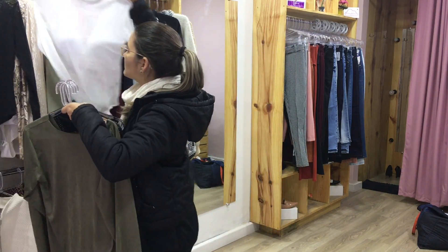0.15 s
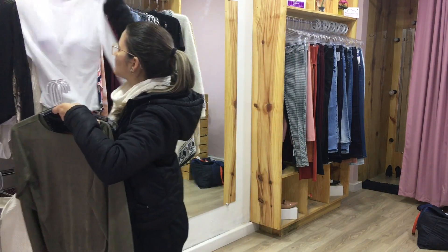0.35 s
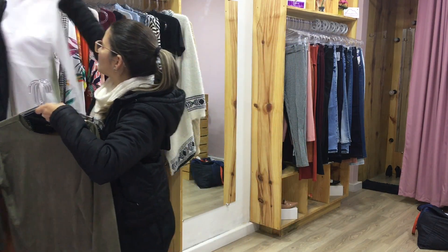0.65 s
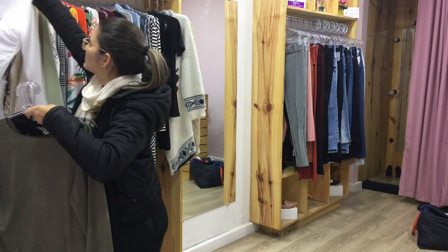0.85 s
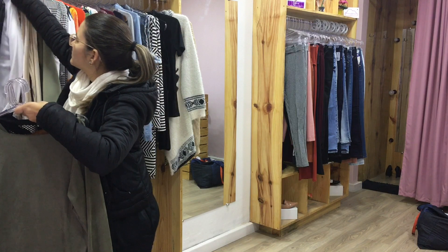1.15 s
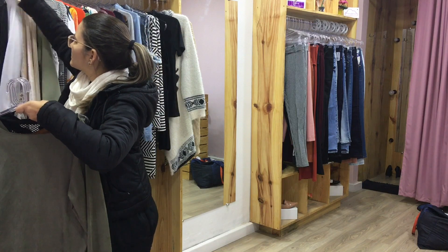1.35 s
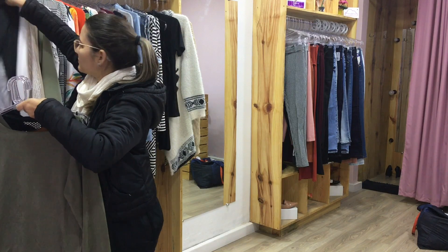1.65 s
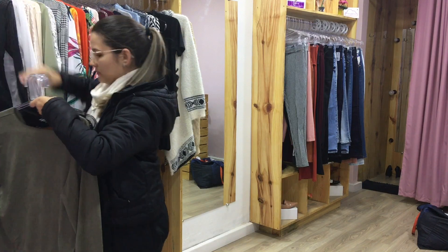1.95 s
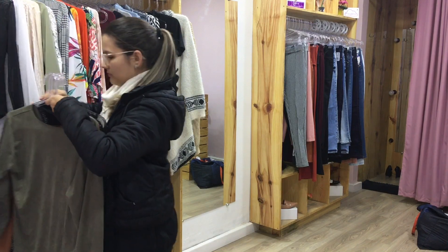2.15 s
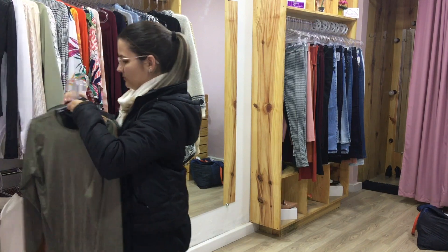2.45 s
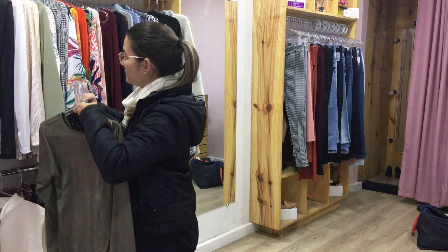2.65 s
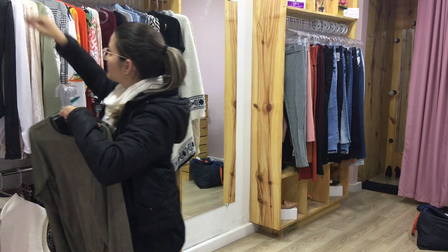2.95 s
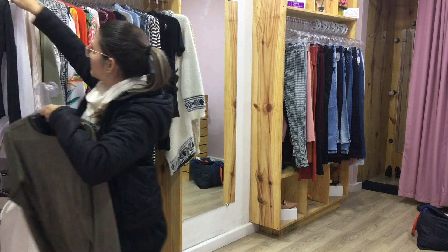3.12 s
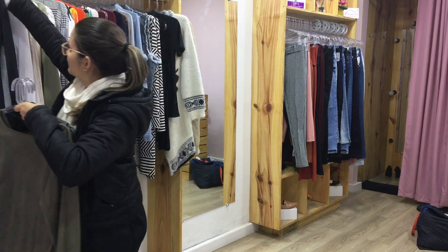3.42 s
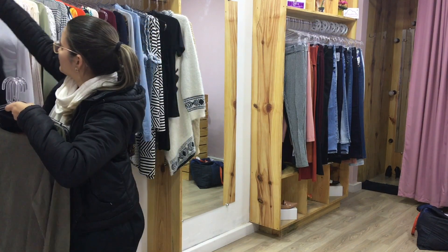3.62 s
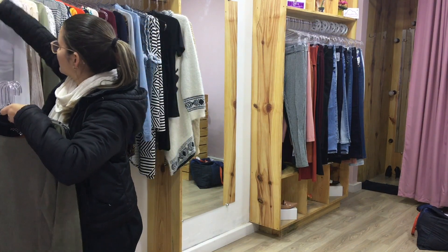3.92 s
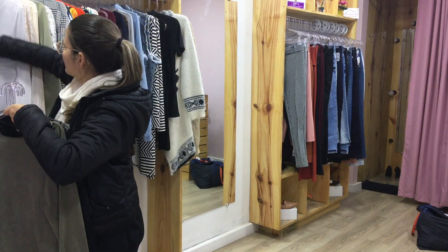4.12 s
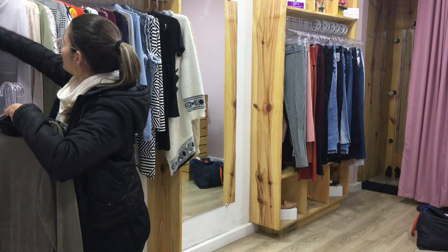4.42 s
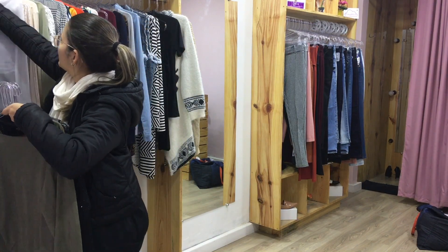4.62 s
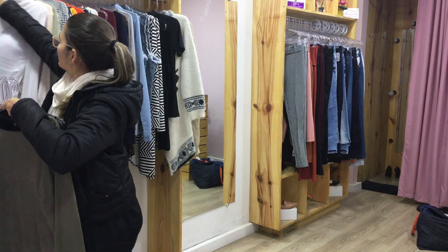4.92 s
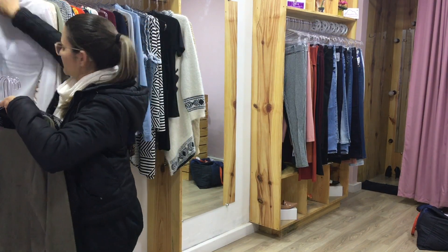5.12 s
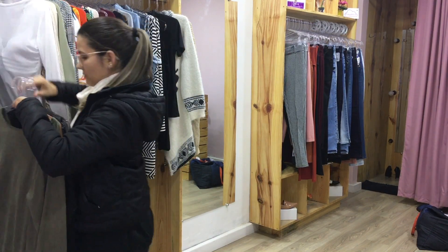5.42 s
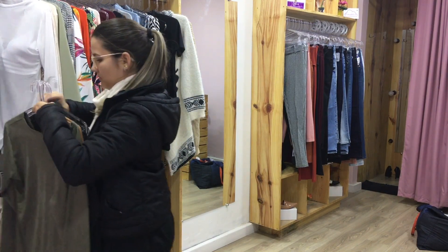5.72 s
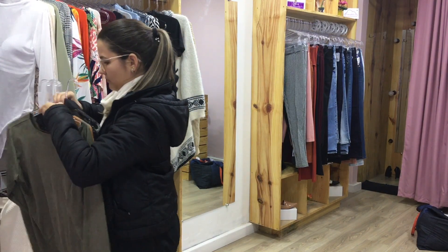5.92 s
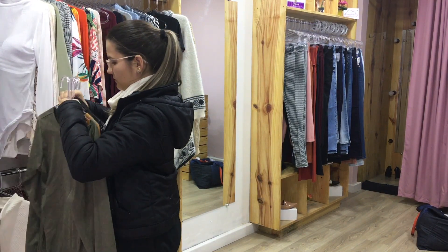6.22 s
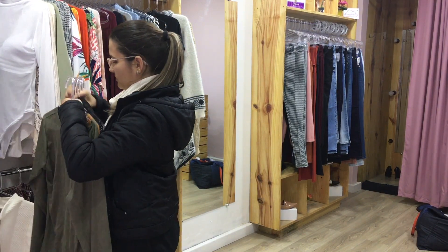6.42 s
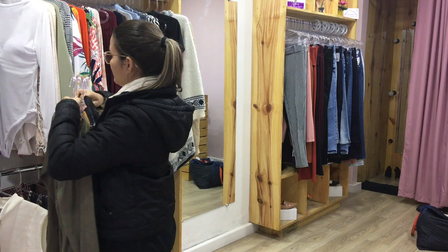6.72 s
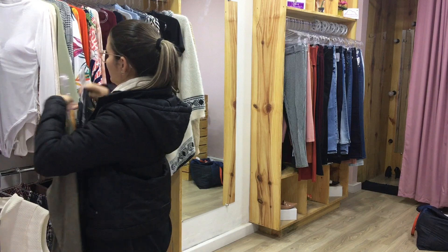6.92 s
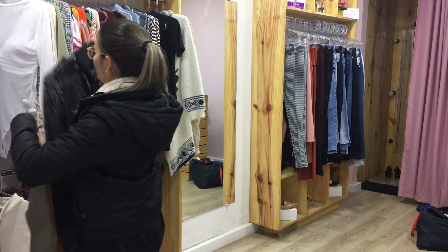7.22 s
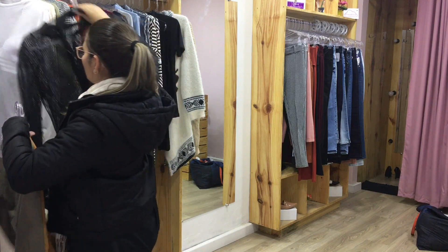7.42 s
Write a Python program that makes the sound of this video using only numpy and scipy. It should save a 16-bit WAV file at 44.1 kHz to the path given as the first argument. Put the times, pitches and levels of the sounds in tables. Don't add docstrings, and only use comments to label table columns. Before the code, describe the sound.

Plastic hangers click and clack sharply on a metal rail in a small shop, over low traffic rumble and an engine revving outside.

```python
import sys
import numpy as np
from scipy import signal
from scipy.fft import rfft, irfft, next_fast_len
from scipy.io import wavfile
from scipy.ndimage import uniform_filter1d, map_coordinates

SR = 44100
rng = np.random.default_rng(int(sys.argv[2]) if len(sys.argv) > 2 else 0)


def generate_wav(signal):
    frames = np.transpose(np.atleast_2d(signal))
    scaled = np.clip(frames, -1, 1) * 32767
    pcm = np.round(scaled).astype(np.int16)
    wavfile.write(sys.argv[1], SR, pcm)


def gain_from_db(level_db):
    decades = np.asarray(level_db, float) / 20
    return 10 ** decades


N = 333396

# time_s, level_db
STREET_LEVEL = [(0.0, -61), (0.25, -62.5), (0.4, -65), (1.1, -64.5), (2.1, -63.5), (2.8, -64.5), (3.3, -61),
                (4.1, -59), (4.7, -56.5), (6.0, -55), (6.9, -53.5), (7.3, -55.5), (7.56, -56)]
# pitch_hz, level_db (per Hz)
RUMBLE_COLOUR = [(18, -44), (30, -17), (70, -6), (135, -13.5), (156, -17), (182, -20.5), (217, -25.5),
                 (253, -21.5), (327, -27.5), (500, -37.5), (650, -51), (1100, -120)]
TYRE_COLOUR = [(180, -4.5), (300, -6.5), (346, 0), (442, -9), (480, -10), (560, -6.5), (668, -7.5),
               (1010, -6.5), (1100, -5), (2530, -18), (5000, -47), (6500, -48), (11000, -120)]
HISS_COLOUR = [(1760, -5), (3000, -1.5), (3480, -2.5), (4800, -8), (5950, -4), (7800, -10), (9190, -7),
               (10500, -11.5), (11600, -8), (14500, -10.5), (15300, -11), (16000, -16), (16500, -31)]
# start_s, hold_s, level_db, pitch_hz
FAR_ENGINES = [(0.0, 0.14, -36.5, 74.2), (0.29, 0.025, -38, 63), (0.52, 0.23, -42.5, 63.1),
               (1.42, 0.034, -41, 75.3), (1.62, 0.055, -41, 60.6), (1.8, 0.033, -39.5, 54),
               (2.0, 0.2, -42, 56.5), (2.26, 0.27, -33.5, 63.9), (2.66, 0.19, -34.5, 63.7),
               (3.03, 0.17, -40, 61.4), (3.3, 0.12, -34.5, 73.4), (3.5, 0.026, -36.5, 69),
               (3.63, 0.075, -31, 64), (3.98, 0.12, -41, 63.4), (4.165, 0.013, -37.5, 60.6),
               (4.24, 0.17, -39, 63.1), (4.72, 0.046, -39, 61), (4.67, 0.12, -49.5, 243),
               (6.575, 0.04, -39, 67.4)]
# start_s, hold_s, level_db, pitch_hz
HEAVY_VEHICLE = [
    (0.0, 0.03, -43, 33),
    (0.75, 0.26, -38, 36.6),
    (2.0, 0.31, -40.5, 36.5),
]
# start_s, hold_s, level_db
BRAKE_SQUEALS = [
    (0.06, 0.075, -69),
    (3.32, 0.15, -69),
    (3.97, 0.03, -80),
    (4.1, 0.04, -78),
    (5.9, 0.19, -71),
    (6.6, 0.25, -69),
]
# start_s, hold_s, boom_db, overshoot_hz
THROTTLE_PUSHES = [
    (4.85, 0.25, -32.5, 9),
    (5.23, 0.72, -30, 0.27),
    (6.063, 0.043, -39.5, 3.9),
    (6.749, 0.08, -33.5, 6),
    (6.915, 0.6, -28.5, 1.4),
]
# start_s, hold_s, level_db
ENGINE_LOAD = [
    (4.8, 0.11, -48.5),
    (5.04, 0.85, -48.5),
    (6.76, 0.076, -55),
    (6.95, 0.7, -47.5),
]
# order (a plain number), level_db
EXHAUST_ORDERS = [(1, 0), (2, -13), (3, -16), (4, -25.5), (5, -29.5), (6, -52), (7, -32), (8, -35),
                  (9, -37), (10, -37), (11, -77), (12, -33), (13, -56), (14, -35.5), (15, -37), (16, -67)]

# pitch_hz, decay_s (time to fall 60 dB)
SHOP_DECAY = [(200, 0.62), (1000, 0.39), (3000, 0.28), (8000, 0.25), (15000, 0.17)]
# start_s, hold_s, level_db
DRAGS = [
    (3.44, 0.02, -55),
    (3.477, 0.042, -38.5),
    (3.54, 0.017, -45),
    (6.55, 0.004, -58),
    (6.64, 0.004, -51),
    (6.72, 0.004, -59),
]
# pitch_hz, level_db (per Hz)
DRAG_COLOUR = [(1180, -39), (2000, -24), (3430, 4), (4820, 1), (5830, 3), (7310, 0), (9090, 2.5),
               (14500, -1), (16000, 5.5)]
# start_s, hold_s, level_db
FRAME_JOLTS = [
    (3.45, 0.03, -48),
    (3.5, 0.034, -44),
    (3.68, 0.0064, -44),
    (3.75, 0.0083, -45.5),
    (4.835, 0.02, -45.5),
    (4.92, 0.04, -45),
    (4.99, 0.01, -40),
]
# pitch_hz, level_db (per Hz)
FRAME_COLOUR = [(130, -15), (220, -6.5), (317, -1), (430, -16), (560, -9.5), (604, -16.5), (905, -12),
                (1560, -13), (1960, -22.5), (2750, -17.5), (4500, -26), (5850, -65), (9900, -120)]
# start_s, hold_s, level_db
GARMENT_BUMPS = [
    (1.078, 0.042, -49),
    (2.996, 0.012, -52),
]
# pitch_hz, level_db (per Hz)
BUMP_COLOURS = [
    [(180, -28), (300, 3.5), (673, -20), (782, 5), (934, -23), (1180, -3.5), (2500, -29), (3250, -55),
     (5500, -120)],
    [(120, -31), (200, -2), (545, -9), (889, -10), (1020, -19), (1110, -14), (1500, -20), (1950, -54),
     (3300, -120)],
]
# start_s, peak_db, pitch_hz, decay_s (time to fall 60 dB)
WOOD_KNOCKS = [(1.2, -43, 790, 0.09), (1.243, -44, 1500, 0.22), (3.465, -42, 287, 0.08),
               (0.33, -54.5, 260, 2.9), (1.232, -34, 238, 0.16), (1.238, -28.5, 280, 0.11),
               (1.24, -34, 287, 0.078), (1.237, -40, 510, 0.079), (1.24, -44, 880, 0.2),
               (1.236, -48, 1590, 0.095), (3, -54, 2500, 0.055), (2.987, -38, 610, 0.055),
               (2.988, -42, 860, .05), (1.245, -50, 4600, .2), (4.99, -41, 2750, 0.11),
               (3.034, -47, 690, .04), (2.94, -43, 280, .07), (2.99, -41, 524, 0.092),
               (3.436, -35, 1252, 0.096), (3.441, -44, 2610, 0.077), (3.5, -33.5, 312, 0.16),
               (3.665, -36.5, 898, 0.17), (3.748, -40, 1553, 0.092), (3.91, -35.5, 320, 0.13),
               (4.83, -34, 930, 0.12), (4.971, -38, 500, 0.12), (4.975, -41, 760, 0.17)]
# start_s, peak_db
BRACKET_TAPS = [(1.233, -31), (1.25, -33), (2.548, -39), (5.02, -43), (2.987, -42), (3.429, -48),
                (3.44, -46), (3.465, -46), (3.548, -38), (3.592, -38), (3.658, -38), (3.746, -33),
                (4.83, -46), (4.895, -42), (4.965, -40), (4.99, -31)]
# pitch_hz, level_db (per Hz)
TAP_COLOUR = [(400, -30), (900, -6), (1500, -1), (2600, -6), (4200, -4), (5000, -19), (7000, -40),
              (12000, -120)]
# start_s, peak_db
TIP_TICKS = [
    (1.224, -30),
    (1.4125, -32),
    (1.4175, -44),
    (1.4323, -56),
    (1.439, -52),
    (2.765, -45),
    (3.901, -33.5),
]
# start_s, peak_db, thump_db (against the peak)
DROPPED_HANGER = [
    (1.2272, -13.5, -11.5),
]
# pitch_hz, level_db (per Hz)
SNAP_COLOUR = [(530, -37), (900, -9.5), (1630, -6), (2350, -13), (3830, -6), (5070, -12.5), (8550, -5),
               (15000, -4.5), (16500, -12)]
THUMP_COLOUR = [(110, -31), (180, -9), (608, 2), (727, -1), (920, -37), (1090, -5), (2600, -13),
                (3380, -42), (5720, -120)]
# pitch_hz, width_hz (not needed), level_db
DROPPED_RING = [(619.0, 42, -10.0), (900, 31, -6), (1595, 76, -4.0), (2110, 52, -11), (3185, 75, -15),
                (3800, 31, -7), (4370, 52, -5), (4620, 55, -2), (7200, 31, -15), (8050, 41, -15),
                (8570, 34, 0.0), (9400, 26, -2), (11740, 29, 8), (12200, 39, -8), (14500, 130, -8),
                (14940, 180, 8), (15600, 36, -8)]
# start_s, peak_db, then against the peak hook_db, arm_db, tip_db
HOOK_CLICKS = [(0.751, -41, -15, -16, -17), (3.5882, -17.5, -18, -11.5, -18),
               (3.7402, -10.5, -20, -10.5, -11), (4.371, -47, -9, -9, -17), (4.9625, -1.3, -26.5, -16, -7),
               (5.609, -35, -10, -16, -20), (5.6321, -23, -21, -18, -22), (6.2587, -18, -15, -13, -8),
               (6.2849, -41, -17, 1, -15), (6.5101, -40, -8, -16, -21), (6.626, -39, -9, -9, -19),
               (6.828, -37.5, -4, -7, -22)]
# start_s, peak_db, then against the peak neck_db, arm_db, tip_db
NECK_RAPS = [(2.5465, -18.5, -17.5, -13.5, -18), (3.6612, -13.5, -18, -16, -10), (4.9648, -9, -19, -18, -8),
             (3.4548, -39, -13, -12, -12), (3.4762, -33, -16, -12, -10), (3.5349, -23, -12, -12, -14),
             (3.6554, -7, -18.5, -16, -9), (3.7606, -40, -16, -8, -14), (4.8186, -19, -19, -12, -6),
             (4.828, -10.5, -21, -16.5, -4), (4.8454, -26.5, -9, -14, -10),
             (4.8938, -9.5, -17.5, -12.5, -11), (4.9191, -25, -10, -12, -6), (4.9448, -7.5, -22, -22, -11),
             (4.9776, -26, -12, -12, -10), (4.984, -20.5, -9, -12, -12), (4.9906, -21, -13, -6, -15)]
# pitch_hz, level_db
MIC_PORT = [(300, -1), (4300, 0.5), (5050, -2.5), (5900, -0.5), (9900, 0), (10600, -4), (11300, 0.5),
            (17000, -1)]

TOP_HZ = 15830


def unit(x):
    return x / np.sqrt(np.mean(x ** 2) + 1e-20)


def along(points, hz):
    f, v = np.transpose(points)
    return np.interp(np.log(hz + 1), np.log(f + 1), v)


def wobble(rate):
    coarse = np.arange(0, N + 32, 32)
    knots = rng.standard_normal(int(N * rate / SR) + 4)
    return np.interp(np.arange(N), coarse, map_coordinates(knots, [coarse * rate / SR]))


def filtered(x, response):
    m = next_fast_len(N + 8192)
    return irfft(rfft(x, m) * response(np.fft.rfftfreq(m, 1 / SR)), m)[:N]


def rush(colour, patchy_db):
    z = signal.stft(rng.standard_normal(N + 512), nperseg=512)[2]
    field = uniform_filter1d(rng.standard_normal(z.shape), size=6, axis=0)
    field = uniform_filter1d(field, size=14, axis=1)
    x = signal.istft(z * gain_from_db(patchy_db * unit(field)), nperseg=512)[1][:N]
    return unit(filtered(x, lambda hz: gain_from_db(along(colour, hz))))


def band(hz, width_hz):
    return unit(filtered(rng.standard_normal(N), lambda f: np.exp(-((f - hz) / width_hz) ** 2)))


def swell(s, hold, db, rise_db, fall_db):
    t = np.arange(N) / SR
    before, after = np.clip(s - t, 0, None), np.clip(t - s - hold, 0, None)
    return gain_from_db(db - rise_db * before - fall_db * after)


def swells(rows, rise_db, fall_db):
    return np.max([swell(s, hold, db, rise_db, fall_db) for s, hold, db, *_ in rows], axis=0)


def add(track, s, sound):
    track[round(s * SR):][:len(sound)] += sound


def in_shop(hit, wet_db, gap):
    hz, t, z = signal.stft(rng.standard_normal(SR // 3), SR, nperseg=256)
    fade = gain_from_db(-60 * t / along(SHOP_DECAY, hz)[:, None])
    tail = signal.istft(z * fade * (hz < TOP_HZ)[:, None], SR, nperseg=256)[1]
    tail = tail * np.clip(np.arange(len(tail)) / SR / gap, 0, 1) ** 2
    out = gain_from_db(wet_db) * signal.fftconvolve(hit, tail / np.linalg.norm(tail))
    out[:len(hit)] += hit
    return out


def street():
    s, db = np.transpose(STREET_LEVEL)
    level_db = np.interp(np.arange(N) / SR, s, db)
    above_quiet_db = level_db + 65
    rumble_db = -45 + 0.31 * above_quiet_db + 0.57 * wobble(4.28)
    rumble = gain_from_db(rumble_db) * rush(RUMBLE_COLOUR, patchy_db=0.54)
    tyres_db = -59 + 0.67 * above_quiet_db + 1.3 * wobble(3.85)
    tyres = gain_from_db(tyres_db) * rush(TYRE_COLOUR, patchy_db=1.04)
    hiss = gain_from_db(level_db + 1.0 + 0.35 * wobble(6)) * rush(HISS_COLOUR, patchy_db=0.7)
    idle = gain_from_db(-51.5) * band(hz=38, width_hz=5.6)
    room_boom = gain_from_db(-47) * band(hz=60.6, width_hz=5.6)
    return rumble + tyres + hiss + idle + room_boom


def hum(rows, unsteady, rise_db, fall_db):
    t, drift = np.arange(N) / SR, unsteady * wobble(14)
    total = np.zeros(N)
    for s, hold, db, hz in rows:
        turn = 2 * np.pi * hz * (t - s) + drift
        total += swell(s, hold, db, rise_db, fall_db) * (np.sin(turn) + gain_from_db(-19) * np.sin(2 * turn))
    return np.sqrt(2) * total


def brakes():
    upper, lower = band(hz=13000, width_hz=300), band(hz=9440, width_hz=200)
    return swells(BRAKE_SQUEALS, rise_db=170, fall_db=110) * (upper + gain_from_db(-5) * lower)


def engine():
    cruise_hz, settle_s, coast_db = 68.87, 0.09, -43
    second_db, flare_db = -20.5, -59
    t = np.arange(N) / SR
    over_hz = sum(hz * np.exp(-np.abs(t - s) / settle_s) for s, _, _, hz in THROTTLE_PUSHES)
    coast = swell(THROTTLE_PUSHES[0][0], N / SR, coast_db, rise_db=150, fall_db=0) * gain_from_db(2.0 * wobble(6.8))
    pushed = swells(THROTTLE_PUSHES, rise_db=140, fall_db=128) * gain_from_db(0.6 * wobble(9))
    boom = np.maximum(pushed, coast)
    speed_hz = (cruise_hz + over_hz) * (1 + 0.0006 * wobble(8))
    turn = 2 * np.pi * np.cumsum(speed_hz) / SR
    second = (boom * gain_from_db(second_db + wobble(9.4)) + gain_from_db(flare_db) * over_hz) * np.sin(2 * turn)
    upper, third_db = np.zeros(N), EXHAUST_ORDERS[2][1]
    for k, db in EXHAUST_ORDERS[2:]:
        upper += gain_from_db(db - third_db + 1.15 * wobble(11)) * np.sin(k * turn + k * k)
    loaded = swells(ENGINE_LOAD, rise_db=150, fall_db=250) * upper
    return np.sqrt(2) * (boom * np.sin(turn) + second + loaded)


def garments():
    total = np.zeros(N)
    for row, colour in zip(GARMENT_BUMPS, BUMP_COLOURS):
        total += swell(*row, rise_db=1300, fall_db=203) * rush(colour, patchy_db=4.5)
    return total


def frame_jolts():
    rattle = unit(rush(FRAME_COLOUR, patchy_db=2.5) * gain_from_db(1.2 * wobble(60)))
    return swells(FRAME_JOLTS, rise_db=262, fall_db=145) * rattle


def drags():
    grain = unit(rush(DRAG_COLOUR, patchy_db=2.5) * gain_from_db(1.2 * wobble(250)))
    return swells(DRAGS, rise_db=1200, fall_db=450) * grain


def knocks():
    track, t = np.zeros(N + SR), np.arange(SR // 2) / SR
    for s, db, hz, t60 in WOOD_KNOCKS:
        spread = 0.016 * min(1, 0.13 / t60)
        trio = sum(np.sin(2 * np.pi * hz * (1 + spread * k) * t + k) for k in (-1, 0, 1.3)) / 2
        hit = gain_from_db(db - 60 * t / t60) * trio * (1 - np.exp(-t / 0.004))
        add(track, s, in_shop(hit, wet_db=-4.5, gap=0.014))
    return track[:N]


def taps():
    track, t = np.zeros(N + SR), np.arange(SR // 20) / SR
    noise = rush(TAP_COLOUR, patchy_db=4.0)
    for s, db in BRACKET_TAPS:
        shape = gain_from_db(db - 8.0 - 60 * t / 0.032) * (1 - np.exp(-t / 0.0014))
        burst = noise[round(s * SR):][:len(t)] * shape
        add(track, s, in_shop(burst, wet_db=-3.5, gap=0.0073))
    return track[:N]


def ticks():
    track, t = np.zeros(N + SR), np.arange(SR // 40) / SR
    for s, db in TIP_TICKS:
        bright = np.diff(rng.standard_normal(len(t) + 2), 2)
        tick = bright * gain_from_db(db - 14.0 - 60 * t / 0.012)
        add(track, s, in_shop(tick, wet_db=-8, gap=0.014))
    return track[:N]


def clack():
    (s, db, thump_db), t = DROPPED_HANGER[0], np.arange(SR // 5) / SR

    def burst(colour, rise, t60):
        return rush(colour, patchy_db=0.5)[:len(t)] * gain_from_db(-60 * t / t60) * (1 - np.exp(-(t / rise) ** 2))

    ring = np.zeros(len(t))
    for hz, _, level_db in DROPPED_RING:
        t60 = 0.13 * (1000 / hz) ** 0.35
        ring += gain_from_db(level_db - 60 * t / t60) * np.sin(2 * np.pi * hz * t + hz)
    snap = gain_from_db(-3.5) * burst(SNAP_COLOUR, rise=0.0014, t60=0.029)
    thump = gain_from_db(thump_db - 5.0) * burst(THUMP_COLOUR, rise=0.013, t60=0.085)
    hit = snap + gain_from_db(-23) * ring * (1 - np.exp(-t / 0.0018)) + thump
    track = np.zeros(N + SR)
    add(track, s, in_shop(gain_from_db(db) * hit, wet_db=-1.0, gap=0.002))
    return track[:N]


def plastic_modes(t, hz, spread_hz, t60, count, focus_db=0):
    shift, size, phase = rng.standard_normal((3, count, 1))
    place = np.linspace(-1, 1, count)[:, None] + shift / count
    level = gain_from_db(2.9 * size - focus_db * np.abs(place))
    ring = (level * np.sin(2 * np.pi * (hz + spread_hz * place) * t + 2 * phase)).sum(axis=0)
    ring = ring * gain_from_db(-60 * t / t60) * (1 - np.exp(-(t / 0.0011) ** 2))
    return ring / np.abs(ring).max()


def contact(db, low_db, arm_db, tip_db, hook_db, neck_db, crack_db, lasts, narrow_db):
    t = np.arange(SR // 10) / SR
    hook = plastic_modes(t, 6400, 596, 0.024 * lasts, count=14, focus_db=8)
    neck = plastic_modes(t, 7600, 990, 0.039 * lasts, count=20, focus_db=5)
    arm = plastic_modes(t, 9500, 1000, 0.025 * lasts, count=20, focus_db=3.5 + narrow_db)
    shoulder = plastic_modes(t, 11950, 1400, 0.036 * lasts, count=30, focus_db=narrow_db)
    tip = plastic_modes(t, 14500, 1300, 0.022 * lasts, count=30)
    body = plastic_modes(t, 3500, 2200, 0.063, count=44) * (1 - np.exp(-t / 0.0053))
    body_db = -30.5 + (0.49 - 1) * db
    crack = np.diff(rng.standard_normal(len(t) + 2), 2) * gain_from_db(-60 * t / 0.011) * (1 - np.exp(-t / 0.00034))
    crack_db = crack_db - 11.5 + 0.3 * tip_db
    hit = gain_from_db(low_db) * (gain_from_db(hook_db) * hook + gain_from_db(neck_db) * neck)
    hit = hit + gain_from_db(arm_db) * arm + gain_from_db(-11.5) * shoulder + gain_from_db(tip_db) * tip
    hit = hit + gain_from_db(body_db) * body + gain_from_db(crack_db) * crack
    return gain_from_db(db + 2.0) * hit


def hangers():
    click = dict(hook_db=0, neck_db=-5, crack_db=-5, lasts=1.25, narrow_db=17)
    rap = dict(hook_db=-4, neck_db=-0.5, crack_db=0.5, lasts=0.75, narrow_db=8)
    track = np.zeros(N + SR)
    for rows, kind in ((HOOK_CLICKS, click), (NECK_RAPS, rap)):
        for s, *levels in rows:
            add(track, s, in_shop(contact(*levels, **kind), wet_db=-3.5, gap=0.0073))
    return filtered(track[:N], lambda hz: gain_from_db(along(MIC_PORT, hz)))


def scene():
    booms = hum(FAR_ENGINES, unsteady=0.44, rise_db=314, fall_db=236)
    booms = booms + hum(HEAVY_VEHICLE, unsteady=0.29, rise_db=33, fall_db=45)
    outside = street() + booms + brakes() + engine()
    soft = filtered(outside + garments() + frame_jolts() + drags(), lambda hz: hz < TOP_HZ)
    return (soft + knocks() + taps() + ticks() + clack() + hangers())[None]


def low_pass(x):
    return signal.sosfilt(signal.butter(12, 16980, fs=SR, output="sos"), x)


def record(dry):
    def phone(hz):
        return (gain_from_db(-26) + np.clip((TOP_HZ - hz) / 120, 0, 1)) * (hz < 16990)

    return low_pass(filtered(dry[0], phone)[None])


dry = scene()
out = record(dry)
generate_wav(out)
```